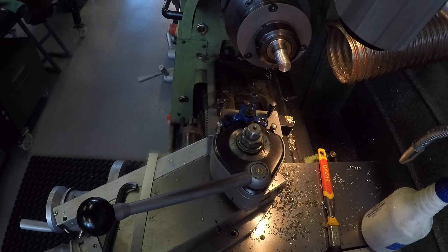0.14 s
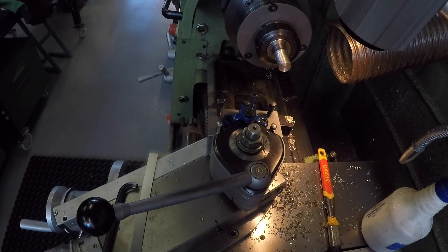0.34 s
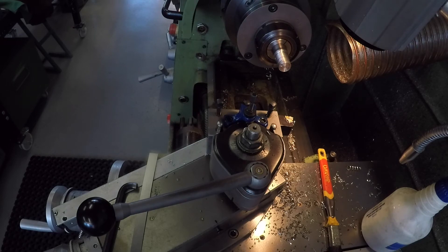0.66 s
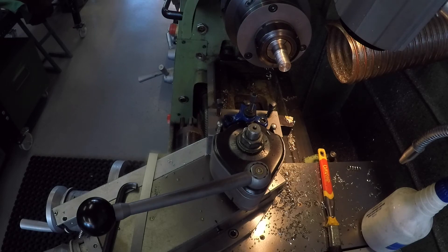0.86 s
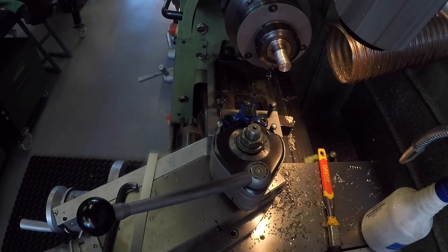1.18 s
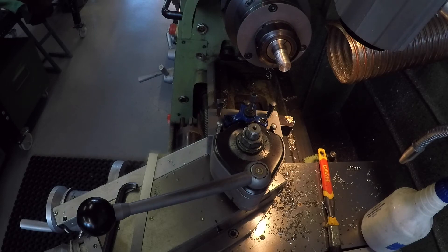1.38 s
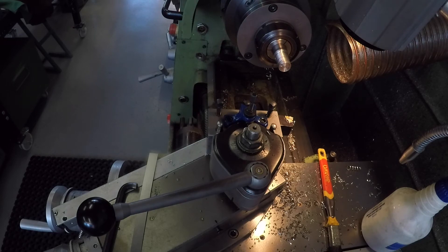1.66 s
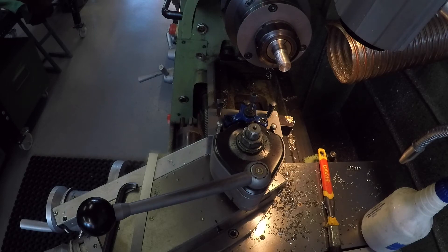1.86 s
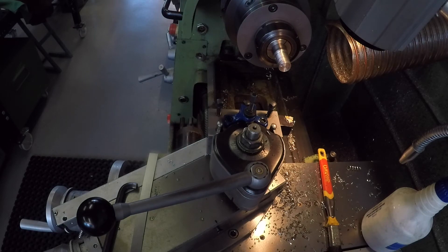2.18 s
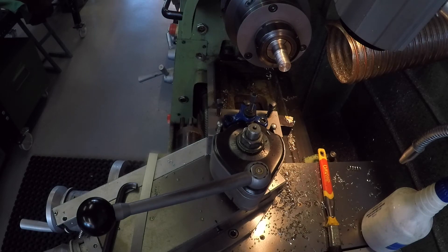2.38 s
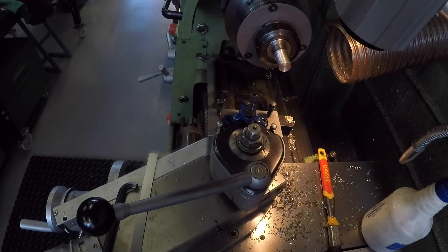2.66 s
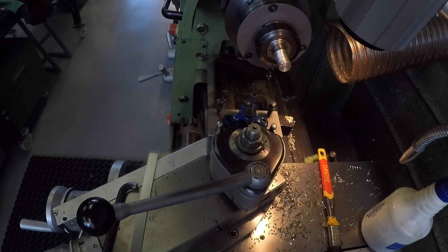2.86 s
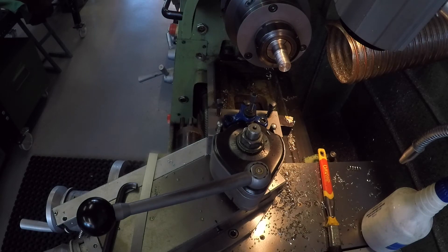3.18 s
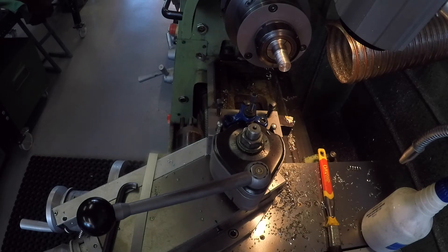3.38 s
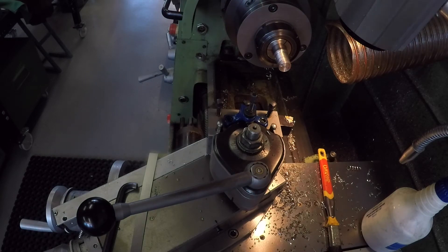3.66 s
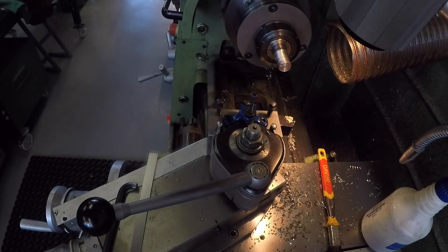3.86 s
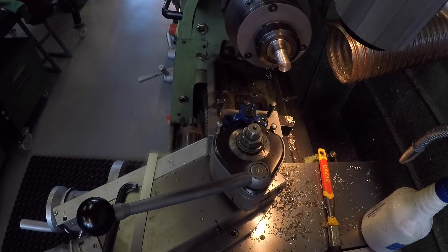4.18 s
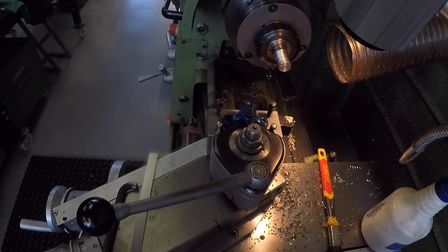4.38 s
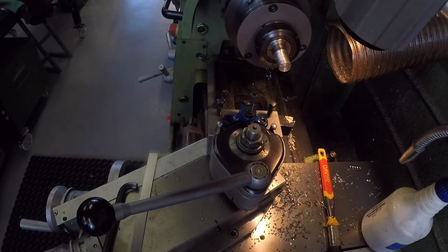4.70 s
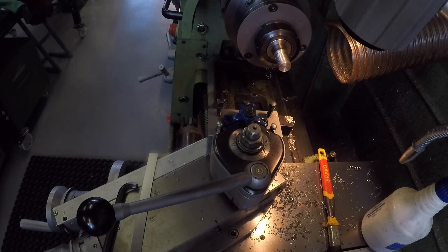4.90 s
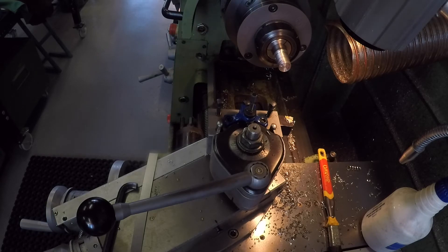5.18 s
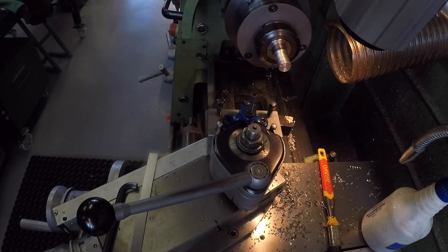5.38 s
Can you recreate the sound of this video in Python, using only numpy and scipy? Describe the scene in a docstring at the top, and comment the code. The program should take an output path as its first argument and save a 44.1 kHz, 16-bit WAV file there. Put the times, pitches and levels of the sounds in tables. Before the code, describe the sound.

A nearby blow gun hisses across a bored metal part, shifting between bright whistling spray and a hollow, pitched roar that pulses more strongly toward the end. The air stops suddenly with a soft valve thump. After a small sharp click, the gun bounces down on sheet metal with a short ringing clatter. The bumped microphone mount rumbles faintly, and cloth brushes past in the quiet of a small workshop.

```python
"""A blow gun's air jet hisses over a bored workpiece on a lathe, clearing chips in a small workshop.
Sweeping across the blind bore it sounds it like a stopped pipe; on the rim it sprays and whistles.
The valve knocks shut, the trigger ticks, and the gun clatters down on sheet metal, which rings.
A jolted camera mount wobbles with a low rumble, and a sleeve brushes past over quiet room tone."""
import sys
import numpy as np
from scipy import signal
from scipy.fft import rfft, irfft, next_fast_len
from scipy.io import wavfile
from scipy.ndimage import map_coordinates

SR = 44100
rng = np.random.default_rng(int(sys.argv[2]) if len(sys.argv) > 2 else 0)


def store_pcm(level_fs):
    """Save levels as 16-bit WAV."""
    pcm = np.round(np.clip(level_fs, -1, 1) * 32767).astype(np.int16)
    wavfile.write(sys.argv[1], SR, np.atleast_2d(pcm).T)


N = 243917
TIME = np.arange(N) / SR


def from_db(db):
    return 10 ** (np.asarray(db) / 20)


def unit_rms(x):
    return x / np.sqrt(np.mean(x ** 2) + 1e-20)


def at_hz(points, hz):
    """A curve read on a log-frequency axis."""
    known_hz, values = np.transpose(points)
    return np.interp(np.log(hz + 1e-9), np.log(known_hz), values)


def noise(colour):
    """Steady noise of rms 1, shaped by an EQ curve (f/Hz, level/dB)."""
    size = next_fast_len(N)
    hz = np.fft.rfftfreq(size, 1 / SR)
    spectrum = rfft(rng.standard_normal(size)) * from_db(at_hz(colour, hz)) * (hz > 18)
    return unit_rms(irfft(spectrum, size)[:N])


def flutter(rate_hz, depth_db):
    """A gain that wanders at random."""
    lowpass = signal.butter(2, rate_hz, fs=SR, output="sos")
    wander = signal.sosfilt(lowpass, rng.standard_normal(N + SR))[SR:]
    return from_db(depth_db * unit_rms(wander))


def bell(peak_s, length_s):
    """A smooth fade up to 1 and back."""
    return np.exp(-2 * ((TIME - peak_s) / length_s) ** 2)


def swells(rows):
    """A level ride in dB, one bell for each row."""
    return sum(db * bell(s, length) for s, length, db in rows)


def blown(resonances, flutter_hz, flutter_db):
    """Turbulence sings in narrow bands, each wavering on its own; rms 1."""
    out = 0
    for hz, width_hz, level_db in resonances:
        band = signal.butter(1, [hz - width_hz / 2, hz + width_hz / 2], "band", fs=SR, output="sos")
        skirt = signal.butter(1, [hz - 2 * width_hz, hz + 2 * width_hz], "band", fs=SR, output="sos")
        tone = signal.sosfilt(np.vstack([band, skirt]), rng.standard_normal(N))
        out = out + from_db(level_db) * tone * flutter(flutter_hz, flutter_db)
    return unit_rms(out)


def clicks(times, levels_db):
    """One impulse at each time."""
    out = np.zeros(N)
    out[np.round(np.asarray(times) * SR).astype(int)] = from_db(levels_db)
    return out


def ring(force, hz, t60):
    """One mode: a unit click starts a decaying sine of height 1."""
    radius, angle = from_db(-60 / (t60 * SR)), 2 * np.pi * hz / SR
    return signal.lfilter([0, np.sin(angle)], [1, -2 * radius * np.cos(angle), radius ** 2], force + 1e-18)


def struck(times, levels_db, modes):
    """Hits ring a bank of modes of alternating polarity."""
    force = clicks(times, levels_db)
    return sum((-1) ** k * from_db(db) * ring(force, hz, t60) for k, (hz, db, t60) in enumerate(modes))


def decaying(sound, t60s):
    """The first second of a sound, each half octave fading by a decay curve (f/Hz, t60/s)."""
    spectrum, hz = rfft(sound[:SR]), np.fft.rfftfreq(SR, 1 / SR)
    edges = np.geomspace(20, SR / 2, 21)
    out = 0
    for low, high in zip(edges, edges[1:]):
        band = irfft(spectrum * (hz >= low) * (hz < high), SR)
        out = out + band * from_db(-60 * TIME[:SR] / at_hz(t60s, np.sqrt(low * high)))
    return out


def bursts(times, levels_db, colour, t60s):
    """Hits on modes too dense to tell apart: decaying noise."""
    out = np.zeros(N + SR)
    for s, db in zip(times, levels_db):
        start = round(s * SR)
        out[start:start + SR] += from_db(db) * decaying(noise(colour), t60s)
    return out[:N]


# the workshop's reverb time: f/Hz, t60/s
ROOM_DECAY = [(200, 0.66), (1400, 0.39), (4000, .39), (8000, 0.39), (14000, 0.31)]
def reverb(dry, wet_db):
    """Direct sound plus a diffuse tail that starts with the nearest surfaces, mixed at equal power."""
    fade_in = np.clip(TIME[:SR] / 0.0025 - .5, 0, 1)
    tail = decaying(rng.standard_normal(SR), ROOM_DECAY) * fade_in
    wet = from_db(wet_db)
    return (dry + wet * signal.fftconvolve(dry, tail / np.linalg.norm(tail))[:N]) / np.sqrt(1 + wet ** 2)


# room tone EQ: f/Hz, level/dB
ROOM_EQ = [(25, 18.5), (60, -1), (145, 4.5), (300, -2.5), (600, -4.5), (1500, -10), (5000, -13),
           (15000, -19.5)]
def room_tone():
    """A quiet, bass-heavy bed of workshop noise."""
    return from_db(-64.5) * noise(ROOM_EQ)


# cloth EQ: f/Hz, level/dB
CLOTH_EQ = [(100, -5), (500, 0), (1400, -0.5), (2700, -8), (4000, -6), (7000, -7), (10000, -12),
            (15000, -22)]
# sleeve strokes: start t/s, hold/s, level/dB
SLEEVE_STROKES = [(4.669, 0.83, -69.5), (4.797, 0.034, -68), (5.188, 0.068, -54.5), (5.454, .03, -71)]
def sleeve():
    """Each stroke of cloth comes in fast, holds and dies away, rubbing in small uneven slips."""
    attack_s, release_db_per_s = 0.013, 227
    envelope = 0
    for s, hold_s, db in SLEEVE_STROKES:
        attack = np.clip((TIME - s) / attack_s, 0, 1)
        envelope = envelope + attack * from_db(db - release_db_per_s * np.maximum(TIME - s - hold_s, 0))
    return envelope * noise(CLOTH_EQ) * flutter(120, depth_db=1.6)


# jolts to the mount: t/s, level/dB
MOUNT_JOLTS = [(3.914, -51.5), (3.955, -47.5), (3.992, -53), (4.146, -42.5)]
def mount_wobble():
    """Sub layer: the camera mount wobbles after each jolt, a slowly fading 27 Hz rumble."""
    return ring(clicks(*np.transpose(MOUNT_JOLTS)), hz=27.2, t60=4.2)


# knocks as the trigger is let go: t/s, level/dB
VALVE_KNOCKS = [(3.2, -39.5), (3.218, -55), (3.238, -40.5)]
def valve_knocks():
    """The closing valve thumps dully in the hand."""
    dull_eq = [(30, 3), (60, -1), (110, -4), (220, -1.5), (400, 0), (900, -9), (3000, -32)]
    return bursts(*np.transpose(VALVE_KNOCKS), dull_eq, t60s=[(50, 0.15), (500, 0.14)])


# metal-on-metal crack EQ, for trigger and clatter: f/Hz, level/dB
CRACK_EQ = [(300, -23), (1000, -9), (2400, 1.5), (3800, -4.5), (5400, 9), (7400, 9.5), (9000, 0.5),
            (12000, -3), (15400, -16)]
# trigger ticks: t/s, level/dB
TRIGGER_TICKS = [(3.7131, -24.5), (3.7298, -40)]
# the gun's body ring: f/Hz, level/dB, t60/s
GUN_MODES = [(4120, -13.5, 0.022), (5130, -8, 0.015), (6170, 0.5, .008), (7360, -7.5, 0.0122),
             (9000, -10, 0.0119)]
def trigger():
    """Small sharp ticks ring the gun itself and leave a faint hollow knock."""
    s, level_db = np.transpose(TRIGGER_TICKS)
    hollow_eq = [(200, -24), (600, -7.5), (1000, -4), (2500, -10), (6000, -19)]
    snap = bursts(s, level_db - 11, CRACK_EQ, t60s=[(500, 0.0244), (14000, 0.044)])
    knock = bursts(s, level_db - 28, hollow_eq, t60s=[(500, 0.77), (5000, 0.41)])
    return reverb(snap + struck(s, level_db, GUN_MODES), wet_db=-11.5) + knock


# the gun's hits: t/s, then level/dB of punch, thud, crack and low ring
GUN_HITS = [(3.9916, -22, -27.5, -41.5, -49), (4.0516, -38, -27.5, -28.5, -59.5),
            (4.1436, -29.5, -32, -20, -69), (4.153, -16.5, -24, -25, -35.5)]
# the crack's tail: f/Hz, t60/s
CRACK_DECAY = [(500, .25), (2000, 0.35), (6000, 0.14), (14000, 0.14)]
# the sheet's bright clang under hard contact, and its low ring: f/Hz, level/dB, t60/s
CLANG_MODES = [(1590, -7, 0.26), (1630, -17.5, .25), (1910, -1, 0.37), (2180, -8.5, 0.48),
               (2410, -4.5, 0.39), (2860, -24, .45), (3160, -3, 0.41), (4430, -0.5, .21),
               (4630, -18.5, .22), (5580, -3, 0.19), (5600, 8, 0.13), (6900, 7.5, 0.11), (7350, -3, .12),
               (7800, 0, 0.22), (8250, -4.5, 0.23)]
LOW_MODES = [(104, -18, 1.6), (207, -16, 3.06), (209, -28, 1.6), (248, -11.5, 1.45), (298, -11, 2.07),
             (309, -4, 1.4), (327, -3.5, 1.8), (371, -4, 1.44), (410, 1.5, 0.86), (433, -7, 1.5),
             (478, 8, 0.74), (505, 6.5, 0.81), (604, -5.5, 1.53), (627, -10.5, 1.8), (613.4, 7, 0.6),
             (625, 0.5, 0.8), (664, -3.5, 1.1), (726, 2, 0.72), (740, 9.5, 0.53), (820, -6, 0.5),
             (814, -7, 0.42), (880, 1, 0.91), (952, 7.5, 0.66), (1130, 0.5, 0.4), (1200, -8, 0.34),
             (1337, 8, 0.42), (1360, -3, 0.39)]
# punch, the struck patch giving way: EQ f/Hz, level/dB; decay f/Hz, t60/s
PUNCH_EQ = [(100, -11), (300, -4), (380, -17.5), (480, -1.5), (620, -3), (790, 7), (1050, -1), (1330, -13),
            (1600, -23), (2400, -28.5), (8000, -46)]
PUNCH_DECAY = [(300, 0.2), (3000, 0.099)]
# thud, the sheet's dense modes: EQ f/Hz, level/dB; decay f/Hz, t60/s
THUD_EQ = [(50, -18), (150, -13), (300, -3.5), (400, -9), (520, -3.5), (760, -0.5), (1250, 0), (1600, -5.5),
           (2400, -5.5), (3700, -13.5), (8000, -25.5), (15000, -57)]
THUD_DECAY = [(100, 0.98), (300, 1), (700, 0.84), (1300, 0.59), (2000, 0.34), (5000, 0.37), (13000, 0.18)]
def clatter():
    """The gun bounces on sheet metal: crack and clang on top, punch and thud for body, a long low ring."""
    s, punch_db, thud_db, crack_db, ring_db = np.transpose(GUN_HITS)
    crack = bursts(s, crack_db, CRACK_EQ, CRACK_DECAY)
    clang = struck(s, crack_db - 13.5, CLANG_MODES)
    punch = bursts(s, punch_db, PUNCH_EQ, PUNCH_DECAY)
    thud = bursts(s, thud_db, THUD_EQ, THUD_DECAY)
    low_ring = struck(s, ring_db, LOW_MODES)
    return reverb(crack, wet_db=-13.5) + clang + punch + thud + low_ring


# the jet catches an edge: peak t/s, length/s, f/Hz, width/Hz, level/dB
EDGE_CATCHES = [(0.145, 0.04, 6360, 1113, -25.5), (0.228, 0.083, 7600.0, 305, -25.5),
                (0.397, 0.138, 11550, 160.0, -29), (0.403, 0.087, 7650, 298.5, -30.5),
                (0.667, 0.305, 8970, 101.4, -31), (0.958, 0.092, 3000, 611, -33.5),
                (1.025, 0.04, 7980, 70.1, -21.5), (1.208, 0.04, 10170.0, 250.0, -23.5),
                (1.382, 0.13, 12500, 1100.0, -20.5), (1.41, 0.127, 7140, 311.4, -24.5),
                (1.668, 0.129, 4355.0, 175.0, -26), (2.114, 0.192, 7200, 329.3, -21),
                (2.175, 0.353, 12040, 334, -25), (2.495, 0.131, 8700, 495, -23),
                (3.036, 0.075, 9400, 450.0, -21.5), (3.277, 0.057, 6080, 900.0, -24)]
def edge_whistles():
    """Each brief whistle swells and fades as the jet crosses its edge."""
    return sum(from_db(db) * bell(s, length) * blown([(hz, width_hz, 0)], flutter_hz=30, flutter_db=2)
               for s, length, hz, width_hz, db in EDGE_CATCHES)


def metal_reflection(direct, lag_s, sway_db, echo_db):
    """Flanging: an echo off the nearby metal combs the spectrum, and the notches move with the hand."""
    lag = lag_s * flutter(3, depth_db=sway_db)
    echo = map_coordinates(direct, [(TIME - lag) * SR], order=3)
    gain = from_db(echo_db)
    return (direct + gain * echo) / np.sqrt(1 + gain ** 2)


# EQ of the free hiss, the roar on the metal and the stirred air around the jet: f/Hz, level/dB
HISS_EQ = [(1000, -30), (2400, -14.5), (3400, -5), (4800, -6), (6100, -5), (7000, 2), (8400, 0),
           (9400, -1.5), (10500, -1), (11200, -2), (12500, 1), (14000, -2), (15400, -2)]
ROAR_EQ = [(25, -23), (60, -32), (150, -31.5), (300, -13.5), (500, -9), (800, -0.5), (1100, 7), (1800, 5.5),
           (2300, -6), (4000, -10)]
DRAUGHT_EQ = [(25, -0.5), (60, -9.5), (110, -2), (160, -5), (220, -6.5), (350, 5), (700, -15.5),
              (2000, -50.5)]
# the stopped bore's note, its overtones, and sustained whistles on the work: f/Hz, width/Hz, level/dB
BORE_NOTE = [(1423.4, 60, 6.5), (1485, 120, 1), (1800, 250, -12)]
BORE_OVERTONES = [(4150, 480, -5.5), (4324, 210, 0.5), (4620, 170, -0.5), (3750, 100, -4.5),
                  (5117, 270, -2.5), (10250, 1400, -4), (14020, 410, -14)]
HELD_WHISTLES = [(7100, 1200, -5), (7600, 130, -3), (7706, 93, 3.5), (7970, 66, 4), (12100, 510, -2.5)]
# slow fader rides as the nozzle drifts: t/s, then relative level/dB of hiss, roar and overtones
NOZZLE_DRIFT = [(0.0, -22.5, -39.5, -29.5), (0.45, -22.5, -40, -33.5), (0.85, -21.5, -43, -33),
                (1.1, -23.5, -42, -32), (1.35, -27, -38.5, -29), (1.75, -20.5, -37, -25.5),
                (2.05, -22.5, -43.5, -27.5), (2.3, -32.5, -40, -33), (2.65, -34.5, -36.5, -42.5),
                (3.26, -23.5, -37, -30)]
# passes over the bore, glances off the rim, buffets of deflected air: peak t/s, length/s, swell/dB
BORE_PASSES = [(0.037, 0.072, 6.5), (0.356, 0.17, 5), (0.539, 0.08, 8.5), (0.653, 0.081, 5.5),
               (0.765, 0.039, 7), (0.98, 0.12, 10.5), (1.215, 0.073, 11), (1.859, 0.091, 6.4),
               (2.021, 0.14, 8.5), (2.208, 0.09, 10), (2.442, 0.081, 15), (2.541, 0.051, 12.5),
               (2.732, 0.11, 16), (2.902, 0.072, 13.5), (3.101, 0.073, 11.5)]
RIM_GLANCES = [(0.132, 0.029, 8.5), (0.231, 0.063, 2.8), (0.831, 0.031, 6.5), (1.005, 0.071, 4.5),
               (1.245, 0.051, 11), (1.399, 0.09, 6), (2.183, 0.12, 8.5), (2.45, 0.26, 13),
               (2.679, 0.077, 5), (2.821, 0.29, 12.3), (3.058, 0.08, 6), (3.149, 0.05, 5.5),
               (3.293, 0.076, 12.5)]
AIR_PUFFS = [(0.141, 0.096, 12), (1.191, 0.069, 11), (2.199, 0.126, 8.5), (2.494, 0.082, 11)]
def air_jet():
    """Over the bore the jet roars and sounds the pipe; on the rim both duck, hiss and whistles rise."""
    shut_s, shut_db_per_s = 3.2613, 900
    drift_s, *rides = np.transpose(NOZZLE_DRIFT)
    hiss_db, roar_db, overtone_db = [np.interp(TIME, drift_s, ride) for ride in rides]
    pass_db, glance_db = swells(BORE_PASSES), swells(RIM_GLANCES)

    def fader(level_db, bore, rim):
        """One layer's gain, with its share of the bore and rim swells."""
        return from_db(level_db + bore * pass_db + rim * glance_db)

    hiss = metal_reflection(noise(HISS_EQ), lag_s=.0016, sway_db=1.2, echo_db=-6)
    hiss *= flutter(35, depth_db=1.33)
    draught = noise(DRAUGHT_EQ) * flutter(11, depth_db=2)
    roar = noise(ROAR_EQ) * flutter(33, depth_db=1.5)
    note = blown(BORE_NOTE, flutter_hz=29.8, flutter_db=-0.5)
    overtones = blown(BORE_OVERTONES, flutter_hz=18, flutter_db=3)
    whistles = blown(HELD_WHISTLES, flutter_hz=5.1, flutter_db=5.5)
    mix = (hiss * fader(hiss_db + 0.82, bore=0.25, rim=0.83)
           + draught * fader(hiss_db + swells(AIR_PUFFS) - 44.2, bore=0.37, rim=0.86)
           + roar * fader(roar_db + 5.02, bore=0.78, rim=-0.86)
           + note * fader(-33.5, bore=1.05, rim=-0.45)
           + overtones * fader(overtone_db - 1.9, bore=0.88, rim=0.49)
           + whistles * fader(hiss_db - 9, bore=0.17, rim=1.28))
    valve = from_db(-shut_db_per_s * np.maximum(TIME - shut_s, 0))
    return valve * (mix + edge_whistles())


def scene():
    """Mono mix: the room tone, the jet with its reverb, and the handling sounds."""
    bed = room_tone()
    jet = reverb(air_jet(), wet_db=-5.5)
    handling = valve_knocks() + trigger() + clatter() + mount_wobble() + sleeve()
    return (bed + jet + handling)[None]


def record(dry):
    """Soft clipping rounds the highest peaks; a steep low-pass cuts the top."""
    ceiling, cutoff_hz = 1.1, 15270
    rounded = np.tanh(dry / ceiling) * ceiling
    return signal.sosfilt(signal.ellip(12, .1, 80, cutoff_hz, fs=SR, output="sos"), rounded)


dry = scene()
out = record(dry)
store_pcm(out)
```